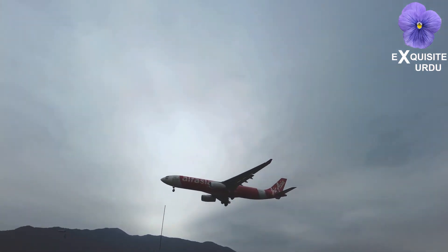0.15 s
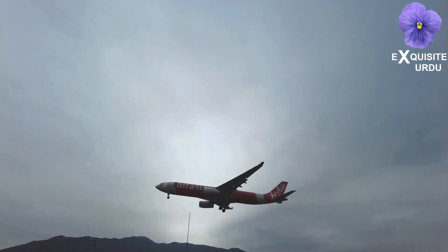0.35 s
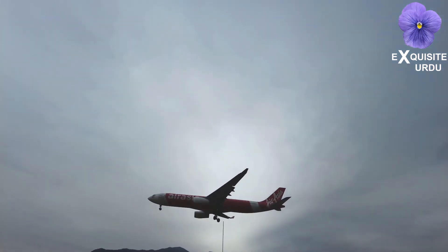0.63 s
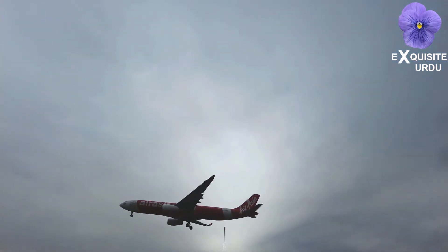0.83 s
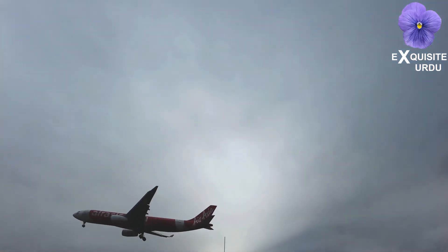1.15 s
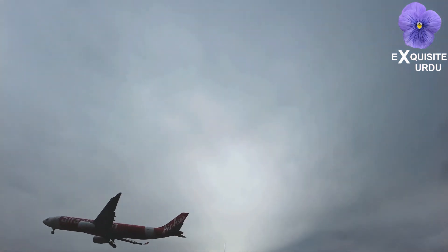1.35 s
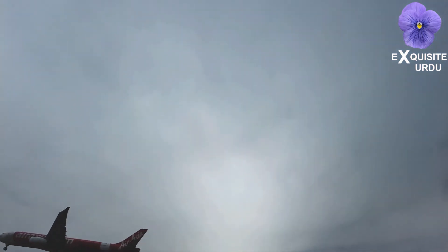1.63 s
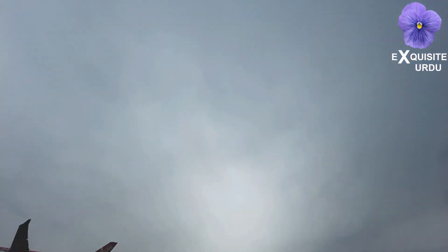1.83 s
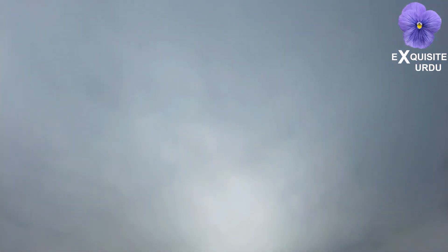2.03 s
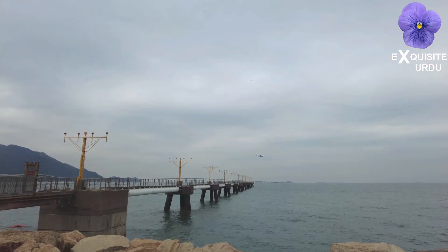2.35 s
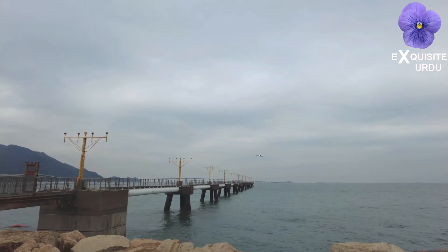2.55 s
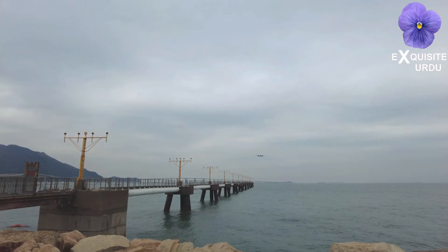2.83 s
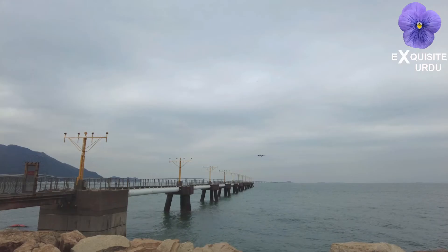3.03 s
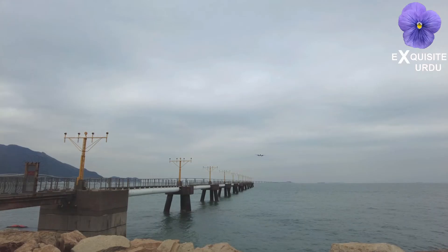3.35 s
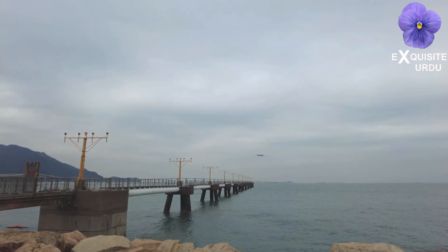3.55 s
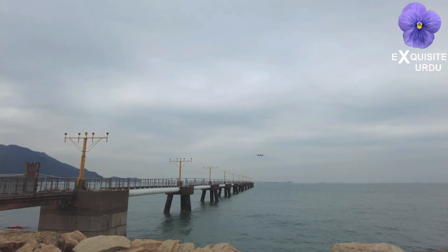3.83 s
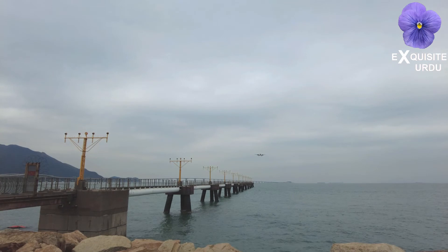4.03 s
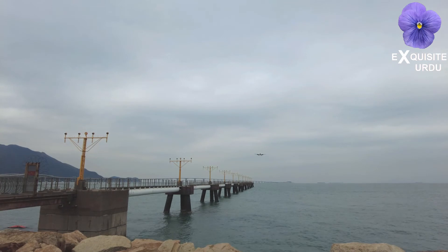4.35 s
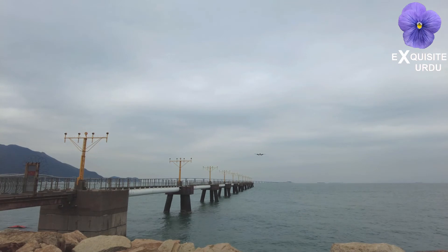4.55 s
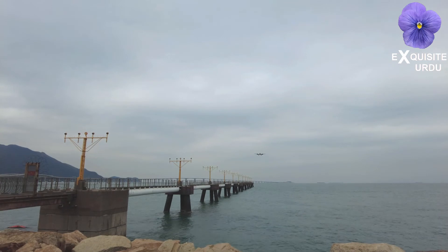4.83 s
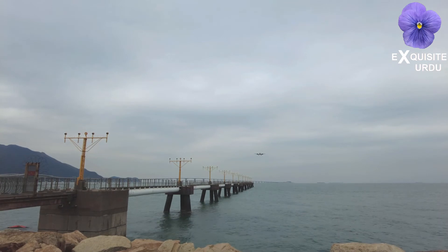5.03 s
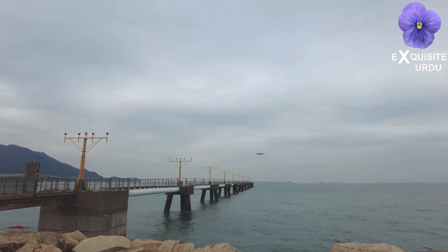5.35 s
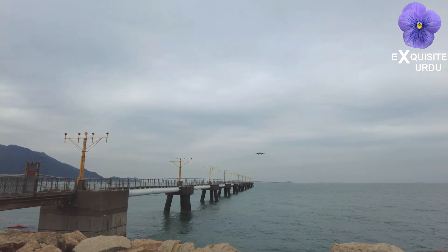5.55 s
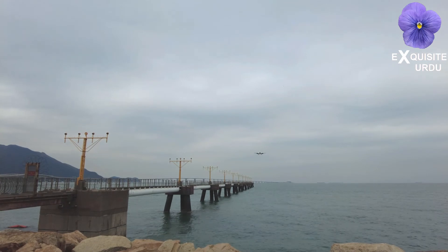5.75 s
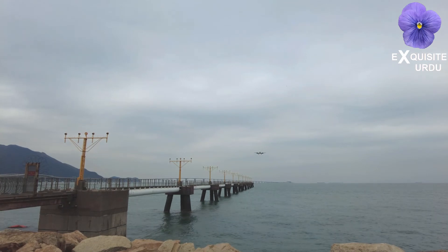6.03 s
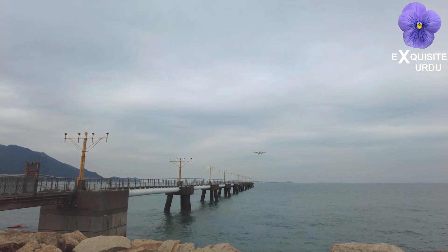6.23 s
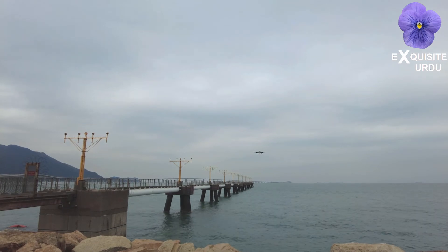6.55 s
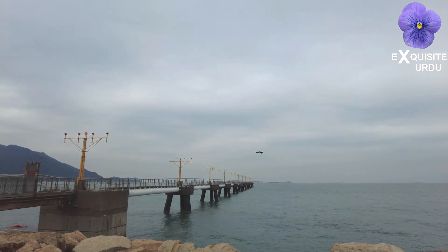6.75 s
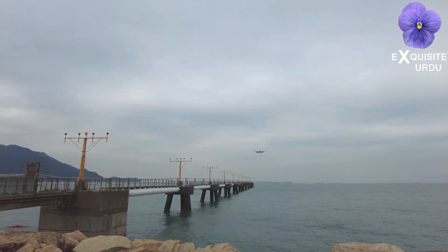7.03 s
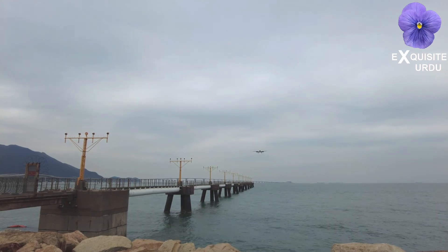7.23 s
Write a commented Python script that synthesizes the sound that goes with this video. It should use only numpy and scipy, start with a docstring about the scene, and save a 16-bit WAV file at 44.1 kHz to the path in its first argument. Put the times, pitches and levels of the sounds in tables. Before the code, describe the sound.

Beside the sea in a light breeze, a low airliner fills the air with engine roar and a hissing whine, drifting leftward. It ends suddenly with a small pop, leaving a quieter shoreline where uneven gusts buffet the microphone. Far-off jets keep up a soft rumble and a wavering high whine, strongest midway through, over occasional small water ticks and a very faint watery hiss.

```python
"""A twin-jet airliner passes low over a sea wall in a light breeze: airframe rumble, jet roar,
fan hiss and gliding engine tones, spreading in stereo as it moves off to the left.
At 2.14 s a hard cut with a pop opens onto the shore. Gusts buffet the microphone, water ticks
on the rocks, and distant jets rumble and whine, fading in and out in the moving air.
The whine peaks near 5 s; towards the end the hiss of the water comes up a little."""
import sys
import numpy as np
from scipy import signal
from scipy.fft import rfft, irfft, next_fast_len
from scipy.io import wavfile
from scipy.ndimage import uniform_filter1d, map_coordinates

SR = 44100
rng = np.random.default_rng(int(sys.argv[2]) if len(sys.argv) > 2 else 0)


def persist_wave(psi):
    """Save psi, clipped to +-1, as 16-bit WAV."""
    counts = np.round(np.clip(psi, -1, 1) * 32767).astype(np.int16)
    wavfile.write(sys.argv[1], SR, np.atleast_2d(counts).T)


N = 325899
TIME = np.arange(N) / SR
CUT_S = 2.140

# level rides of the pass: (time [s], airframe rumble [dB], jet roar [dB], fan hiss [dB], hiss top [dB])
PASS_LEVELS = [(0.0, -28.5, -25, -39, -70), (0.35, -22.5, -25, -38, -61.5), (0.65, -26, -25, -39.5, -54.5),
               (0.9, -24, -25, -38, -50), (1.0, -22, -24.5, -36.5, -44.5), (1.2, -24, -26.5, -36.5, -50.5),
               (1.45, -21.5, -25, -35.5, -45.5), (1.9, -27, -26, -33, -52.5), (2.12, -23, -26, -36, -54)]
# colour of the fan hiss overhead: (frequency [Hz], relative level [dB])
FAN_COLOUR = [(2000, 5), (2300, 0.5), (2600, 1.5), (3100, 1), (3600, -4.5), (4450, -0.7), (5400, -6),
              (5900, -3.5), (7000, -8.5), (7800, -3), (8500, -9.5), (9300, -9.5), (10700, -20),
              (12600, -38)]
# stereo width overhead and on the shore: (frequency [Hz], side minus mid [dB])
NEAR_WIDTH = [(60, -25), (130, -29.5), (330, -20), (600, -16), (1100, -13), (1840, -16.5), (2700, -11),
              (3400, -4), (5780, -4.5), (10200, -4)]
SHORE_WIDTH = [(60, -95), (110, -88.5), (190, -78.5), (330, -51), (590, -41), (1040, -28.5), (1840, -34.5),
               (3270, -20), (5780, -4.5), (10200, -4)]
# water ticking on the rocks: (time [s], peak [dB], pitch [Hz], half-length [s])
WATER_TICKS = [(2.311, -46, 4500, .003), (2.381, -41, 2100, .0006), (2.381, -47, 4200, .0005),
               (2.775, -50, 4400, .0006), (2.786, -47, 4200, .0008), (3.404, -41, 2600, .0007),
               (3.457, -22, 1000, .001), (3.491, -52, 4400, .007), (4.644, -53, 4300, .008),
               (6.168, -43, 3600, .0004), (6.496, -49, 4000, .0006)]


def from_db(db):
    """Decibels to gain."""
    return 10 ** (np.asarray(db) / 20)


def rms_one(x):
    """Scale to unit power."""
    return x / np.sqrt(np.mean(x ** 2) + 1e-20)


def in_time(rows):
    """One automation curve for each column after the time."""
    s, *columns = np.transpose(rows)
    return [np.interp(TIME, s, c) for c in columns]


def at_hz(points, hz):
    """Read a spectrum on a log-frequency axis."""
    at, values = np.transpose(points)
    return np.interp(np.log(hz), np.log(at), values)


def drift(rate):
    """Smooth random modulation of spread 1 that changes about rate times a second."""
    pole = np.exp(-40 * np.pi * rate / SR)
    slow = signal.lfilter([1], [1, -2 * pole, pole * pole], rng.standard_normal(N // 20 + 2002))[2000:]
    return np.interp(np.arange(N) / 20, np.arange(len(slow)), rms_one(slow))


def turbulence(spectrum, width, band):
    """Stereo noise of a given colour, falling steeply past its ends, with unit mid power inside band."""
    size = next_fast_len(N)
    hz = np.maximum(np.fft.rfftfreq(size, 1 / SR), 1)
    skirts = np.minimum(1, np.minimum(hz / spectrum[0][0], spectrum[-1][0] / hz)) ** 6
    gain = from_db(at_hz(spectrum, hz)) * skirts
    gain /= np.sqrt(np.mean(gain ** 2 * (hz > band[0]) * (hz < band[1])))
    mid, side = rfft(rng.standard_normal((2, size))) * gain
    side *= from_db(at_hz(width, hz))
    return irfft([mid + side, mid - side], size)[:, :N]


def split(x, hz):
    """The parts below and above a crossover."""
    sides = [signal.butter(2, hz, kind, fs=SR, output="sos") for kind in ("low", "high")]
    return [signal.sosfilt(np.vstack([sos, sos]), x) for sos in sides]


def steady(x, size):
    """Level out a sound's own swells over size samples, so that its envelope sets the dynamics."""
    power = np.mean(x ** 2, axis=0)
    return x * np.sqrt(power.mean() / (uniform_filter1d(power, size) + 1e-12))


def surges(rows, rise_s, fall_s, floor_db):
    """Envelope of (start, length, level) surges that rise, hold and die away, summed over a floor."""
    power = from_db(floor_db) ** 2
    for start, length, db in rows:
        attack = np.clip((TIME - start) / rise_s, 0, 1)
        release = np.exp(-np.clip((TIME - start - length) / fall_s, 0, 20))
        power = power + (from_db(db) * attack * release) ** 2
    return np.sqrt(power)


def air_fading(x, crossovers_hz, fade_db, fades_per_s=16):
    """Turbulent air on the way lets each band swell and sink on its own."""
    bands = []
    for hz in crossovers_hz:
        low, x = split(x, hz)
        bands = [sum(split(band, hz)) for band in bands] + [low]   # keeps the bands in phase
    return sum(band * from_db(fade_db * drift(fades_per_s)) for band in bands + [x])


def blade_tone(hz, width_hz, rough):
    """A blade tone of unit power; air turbulence scatters the share rough of it into a narrow band."""
    scatter = (drift(width_hz) + 1j * drift(width_hz)) / np.sqrt(2)
    carrier = np.exp(2j * np.pi * np.cumsum(hz) / SR)
    return np.sqrt(2) * np.real((np.sqrt(1 - rough) + np.sqrt(rough) * scatter) * carrier)


def water():
    """A faint high hiss swells and sinks; a soft splash surrounds each high tick."""
    # bed of water hiss: (time [s], level [dB])
    bed = [(2.2, -81), (3.0, -81), (3.85, -84), (4.3, -73), (5.0, -73), (5.6, -70.5), (6.3, -68.5),
           (6.68, -73), (6.95, -69.5), (7.25, -72), (7.39, -68.5)]
    # brief, faint swells of high hiss: (start [s], length [s], level [dB])
    hiss_swells = [(2.33, .1, -73), (2.53, .05, -73), (2.63, .05, -74), (2.83, .09, -71), (2.99, .06, -71),
                   (3.31, .04, -71), (3.63, .04, -73), (3.72, .04, -73), (3.98, .12, -71), (4.26, .14, -73),
                   (6.2, .09, -69), (6.36, .1, -69)]
    # colour of the hiss: (frequency [Hz], relative level [dB])
    colour = [(2500, 18), (3600, 10), (4300, 8.5), (5200, 1.5), (6500, -8.5), (8000, -16.5), (10000, -23),
              (12000, -28)]
    splash_gain_db, splash_decay_s = -42, .012
    bed_db, = in_time(bed)
    hiss = surges(hiss_swells, rise_s=.02, fall_s=.015, floor_db=bed_db) * from_db(1.1 * drift(25))
    splash = sum(from_db(db + splash_gain_db) * np.exp(-np.abs(TIME - s) / splash_decay_s)
                 for s, db, hz, _ in WATER_TICKS if hz > colour[0][0])
    return (hiss + splash) * turbulence(colour, SHORE_WIDTH, (3700, 9000))


def ticks_and_pops(pitch_scatter=.12, pop_hz=500):
    """Brief ticks like drops of water, and pops where the pressure jumps and sinks back."""
    # sharp pops: (time [s], pressure step [dB])
    pops = [(2.1395, -21), (2.764, -21)]
    out = np.zeros(N)
    age = np.arange(-1000, 1000) / SR
    smoothing = signal.butter(1, 900, fs=SR, output="sos")
    for s, db, hz, half_length in WATER_TICKS:
        wobble = rms_one(signal.sosfilt(smoothing, rng.standard_normal(len(age))))
        phase = 2 * np.pi * np.cumsum(hz * (1 + pitch_scatter * wobble)) / SR
        tick = from_db(db) * np.exp(-(age / half_length) ** 2) * np.sin(phase)
        out += np.interp(TIME - s, age, tick, 0, 0)
    for s, db in pops:
        out += from_db(db) * (TIME >= s) * np.exp(-2 * np.pi * pop_hz * np.clip(TIME - s, 0, .02))
    return out


def breeze():
    """Light air pushes on the microphone: a low bed with a few soft puffs."""
    # colour of the breeze: (frequency [Hz], relative level [dB])
    colour = [(16, -6), (25, -10), (42, -6), (70, -9.5), (110, -26.5), (200, -18)]
    # its stereo width: (frequency [Hz], side minus mid [dB])
    width = [(30, -48), (150, -37)]
    # soft puffs: (start [s], length [s], level [dB])
    puffs = [(.42, 0.24, -30), (1.43, .2, -27), (1.74, 0.1, -22.5)]
    air = steady(turbulence(colour, width, (20, 110)), size=3500)
    return air * surges(puffs, rise_s=.014, fall_s=.016, floor_db=-28)


def shore_gusts(rise_s=.014, fall_s=.016, flutter_floor_db=-39):
    """Eddies buffet the microphone; strong gusts break up into a lumpy, higher flutter."""
    # gusts: (start [s], length [s], deep buffet [dB], flutter [dB])
    gusts = [(2.168, 0.061, -22.5, -38), (2.251, 0.081, -25.5, -43.5), (2.488, 0.11, -28, -57),
             (2.703, 0.13, -28, -40), (2.934, 0.049, -24.5, -42), (3.175, 0.14, -26.5, -36),
             (3.374, 0.12, -23, -32.5), (3.523, 0.096, -29.5, -42), (3.75, 0.24, -27, -39),
             (4.089, 0.14, -20.5, -34.5), (4.444, 0.088, -24.5, -40), (4.558, 0.059, -29.5, -36.5),
             (4.654, 0.088, -24, -39), (4.908, 0.082, -28, -45), (5.204, 0.062, -30, -57),
             (5.92, 0.041, -31, -39), (6.23, 0.13, -28, -38.5), (6.516, 0.35, -32, -35),
             (6.653, 0.12, -25, -37), (6.845, 0.12, -26, -33.5), (7.059, 0.13, -29.5, -32.5),
             (7.194, 0.095, -22.5, -35)]
    # buffeting between gusts, at one point almost calm: (time [s], level [dB])
    lull = [(2.2, -33.5), (5.3, -34), (5.5, -44), (6.05, -41), (6.3, -34.5), (7.39, -32.5)]
    # colours of the two wind layers: (frequency [Hz], relative level [dB])
    buffet_colour = [(16, -9.5), (25, 3.5), (45, 2.5), (75, 1), (115, 0.5), (170, -14), (300, -35.5)]
    flutter_colour = [(80, -14.5), (140, 0), (220, -1), (330, -7.5), (600, -16), (1200, -43), (3000, -49)]
    start, length, buffet_db, flutter_db = np.transpose(gusts)
    lull_db, = in_time(lull)
    swing_db = .4 * drift(7.5)
    buffet = steady(turbulence(buffet_colour, SHORE_WIDTH, (20, 140)), size=2600)
    buffet *= surges(zip(start, length, buffet_db), rise_s, fall_s, lull_db + swing_db)
    flutter = steady(turbulence(flutter_colour, SHORE_WIDTH, (150, 400)), size=2000)
    flutter *= from_db(1.2 * drift(35))
    flutter *= surges(zip(start, length, flutter_db), rise_s, fall_s, flutter_floor_db + swing_db)
    return buffet + flutter


def wind_knocks():
    """Single eddies hit the microphone: each a short, dull thump."""
    # eddy hits: (centre [s], length [s], level [dB])
    hits = [(2.186, .032, -23), (2.298, .034, -27), (2.52, .028, -28), (2.743, .028, -24.5),
            (2.783, .026, -26.5), (2.808, .026, -24.5), (2.98, .046, -24), (3.198, .034, -26),
            (3.248, .032, -26.5), (3.422, .044, -20), (3.562, .026, -25), (4.465, .026, -24.5),
            (4.495, .036, -25), (6.701, .032, -19), (7.205, .03, -26.5), (7.262, .034, -23.5),
            (7.372, .03, -26)]
    # colour of a thump: (frequency [Hz], relative level [dB])
    colour = [(70, 5), (130, 6.5), (220, 3), (350, -5.5), (600, -18.5), (1200, -29.5), (3000, -42.5)]
    out, eddies = np.zeros((2, N)), turbulence(colour, SHORE_WIDTH, (90, 1000))
    for s, length, db in hits:
        during = np.abs(TIME - s) < length / 2
        bell = np.cos(np.pi * (TIME[during] - s) / length)
        out[:, during] += from_db(db) * rms_one(eddies[:, during] * bell) / np.sqrt(2)
    return out


def distant_jets():
    """Far jet roar, stripped of its treble by the air and flickering in it."""
    # level rides of the far jets: (time [s], rumble [dB], roar [dB], hiss [dB])
    levels = [(2.2, -43.5, -40, -61), (3.1, -36, -37.5, -61), (3.5, -40.5, -37, -59),
              (3.85, -32, -38.5, -60), (4.4, -39.5, -34, -55.5), (5.05, -35, -32.5, -54),
              (5.35, -32.5, -34.5, -57), (5.6, -34.5, -37.5, -55.5), (6.1, -31.5, -40, -62.5),
              (6.65, -33.5, -40.5, -58), (7.39, -34, -35, -55)]
    # their colour: (frequency [Hz], relative level [dB])
    colour = [(60, 5.5), (110, 7), (230, -3.5), (380, -6.5), (500, 0), (820, -9.5), (1000, -7.5),
              (1130, -11), (1570, -10), (1850, -13), (2170, -14), (2400, -20.5), (2700, -18.5),
              (3700, -42.5)]
    # edges of the bands that fade separately: (crossover [Hz])
    crossovers = [750, 1200]
    rumble_db, roar_db, hiss_db = in_time(levels)
    rumble, rest = split(turbulence(colour, SHORE_WIDTH, (480, 1800)), 300)
    roar, hiss = split(rest, 2220)
    roar = from_db(roar_db) * air_fading(rms_one(roar), crossovers, fade_db=1.14)
    hiss = from_db(hiss_db + .5 * drift(12)) * rms_one(hiss)
    return from_db(rumble_db) * steady(rms_one(rumble), size=5000) + roar + hiss


def distant_fans(start_hz=2135, sag_hz_per_s=3.6, detune_hz=143):
    """Two engine fans whine at slightly different speeds, sagging slowly in pitch."""
    # moving air carries the whine over in swells: (start [s], length [s], level [dB])
    swells = [(2.36, 0.52, -58.5), (3.14, 0.36, -55.5), (3.96, 0.14, -54), (4.57, 0.23, -47),
              (4.76, 0.42, -44.5), (5.49, 0.17, -48), (5.94, 0.13, -57), (6.48, 0.47, -55),
              (6.87, 0.24, -49)]
    hz = start_hz - sag_hz_per_s * (TIME - CUT_S)
    carried = surges(swells, rise_s=.05, fall_s=.06, floor_db=-62)
    core = blade_tone(hz, width_hz=23, rough=.023)
    halo = from_db(-7.5) * blade_tone(hz, width_hz=120, rough=1)
    second_fan = from_db(-37) * blade_tone(hz + detune_hz, width_hz=8.6, rough=.93)
    return carried * (core + halo) + np.sqrt(carried) * second_fan


def distant_whistle(waver_hz=13):
    """A thin, fluttering jet whistle in the centre, with a faint, rougher spread at the sides."""
    # path of the whistle: (time [s], level [dB], pitch [Hz])
    path = [(2.2, -66, 3405), (2.5, -72, 3407), (2.82, -63.5, 3409), (3.5, -67.5, 3396),
            (3.93, -66.5, 3385), (4.05, -60.5, 3398), (4.17, -60.5, 3402), (4.39, -52.5, 3412),
            (4.58, -60, 3403), (4.83, -53.5, 3396), (4.97, -62, 3395), (5.16, -55, 3398), (5.4, -60, 3402),
            (5.56, -57.5, 3400), (5.77, -63, 3394), (5.94, -55.5, 3399), (6.1, -63, 3395),
            (6.33, -65, 3395), (6.51, -55, 3397), (6.7, -62, 3385), (7.05, -57, 3397), (7.2, -58.5, 3392),
            (7.3, -54, 3387), (7.39, -56, 3388)]
    db, hz = in_time(path)
    mid = blade_tone(hz + waver_hz * drift(25), width_hz=34, rough=.49)
    side = from_db(-16) * blade_tone(hz, width_hz=40, rough=.9)
    return from_db(db + drift(18)) * (mid + side * [[1], [-1]])


def microphone_ports(x):
    """Sound from above widens and comes to reach the left port first; each port colours it its own way."""
    # the aircraft moving off to the left: (time [s], left lead [s], side gain [dB])
    bearing = [(0, 0, -5.5), (1.0, 0, -1.5), (1.6, 2.8e-5, 3.5)]
    # tilt between the ports: (frequency [Hz], left minus right [dB])
    balance = [(190, -0.5), (450, 0.5), (1000, -0.5), (1900, -1.5), (3300, -2), (5800, -0.5), (9000, 1)]
    lead_s, side_db = in_time(bearing)
    mid, side = (x[0] + x[1]) / 2, from_db(side_db) * (x[0] - x[1]) / 2
    size = next_fast_len(N)
    hz = np.maximum(np.fft.rfftfreq(size, 1 / SR), 1)
    lean = from_db(at_hz(balance, hz) / 2)
    left, right = irfft(rfft([mid + side, mid - side], size) * [lean, 1 / lean], size)[:, :N]
    return np.array([left, map_coordinates(right, [(TIME - lead_s) * SR], order=3)])


def shore_echoes(x, wall_s=.0037, wall_db=-12, rock_db=-17, growth_per_s=.11):
    """Wall and rocks return dull copies; delays grow as the aircraft moves, flanging the roar downward."""
    dull, _ = split(x, 2200)
    rocks = [(s, from_db(rock_db) * drift(1)) for s in rng.uniform(.002, .009, size=6)]
    for delay_s, gain in [(wall_s, from_db(wall_db))] + rocks:
        delayed = TIME - delay_s * (1 + growth_per_s * TIME)
        x = x + gain * np.array([np.interp(delayed, TIME, channel) for channel in dull])
    return x


def turbine_sheen(count=26, sheen_db=-8, rise_per_s=.05):
    """Many faint, rising engine tones drift in and out through the turbulent wake."""
    _, _, hiss_db, _ = in_time(PASS_LEVELS)
    size = round(CUT_S * SR) + 100
    t, out = TIME[:size], np.zeros((2, N))
    flutter_band = signal.butter(2, [8, 70], "band", fs=SR / 20, output="sos")
    for hz in np.geomspace(2500, 7300, count) * rng.uniform(.86, 1.03, count):
        pitch = hz * (1 + rise_per_s * rng.uniform(0, 2) * (t - t.mean()))
        phase = 2 * np.pi * np.cumsum(pitch) / SR
        flutter = np.interp(t, t[::20], signal.sosfilt(flutter_band, rng.standard_normal(len(t[::20]))))
        fade_db = 4 * rng.standard_normal(12).clip(-2, 1.2)
        fade = from_db(np.interp(t, np.linspace(0, CUT_S, 12), fade_db))
        arrival = rng.normal(0, .4, (2, 1))   # each tone meets the two ports at its own phase
        out[:, :size] += from_db(at_hz(FAN_COLOUR, hz)) * fade * flutter * np.sin(phase + arrival)
    return from_db(hiss_db + sheen_db) * out / np.sqrt(np.mean(out[:, :size] ** 2))


def engine_tone(start, length, hz, glide, db, rough, width_hz):
    """A narrow band of engine sound beams past, swelling and gliding, as wide in stereo as the roar."""
    progress = np.clip((TIME - start) / length, 0, 1)
    pitch = hz * 2 ** (glide * length * (progress - .5))
    swell = from_db(db) * np.sqrt(np.abs(np.sin(np.pi * progress)))
    side = from_db(at_hz(NEAR_WIDTH, pitch[0])) * blade_tone(pitch, width_hz, rough)
    mid = blade_tone(pitch, width_hz, rough)
    return swell * steady(mid + side * [[1], [-1]], size=3000)


def engine_glides():
    """The passing engines throw out low flares, mostly falling, and turbine whine, mostly rising."""
    # flares: (start [s], length [s], pitch [Hz], glide [octaves/s], level [dB], roughness [0-1])
    flares = [(0.0, 0.48, 161.6, -0.1, -27, .6), (0.17, 0.29, 950, -0.21, -28, .1),
              (.17, 0.13, 1180, -.1, -32.5, .2), (0.34, 0.11, 175, 0.1, -24.5, .6),
              (.36, 0.07, 330, -0.216, -23.5, .7), (0.618, 0.52, 228, -0.3, -26.5, .6),
              (0.708, .14, 291.7, -0.17, -22, .5), (0.85, 0.32, 1072, -0.14, -29.5, .2),
              (1.24, .12, 225, -.3, -25, .6), (1.29, 0.27, 428, 0.15, -24.3, .6),
              (1.365, 0.18, 326, -0.21, -25, .8), (1.52, .16, 1465, 0.1, -33, .6),
              (1.55, .24, 225, -.2, -25.5, .6), (1.59, .12, 780, -.1, -30, 1),
              (1.6, .28, 575, -.9, -30, .6), (1.62, .2, 996, -0.08, -31.5, .15),
              (1.99, .18, 398, -0.4, -25.5, .6)]
    # strands of whine: (start [s], length [s], pitch [Hz], glide [octaves/s], level [dB])
    strands = [(.63, .28, 4400, 0.45, -46.5), (.92, .17, 2960, -0.2, -44), (.95, .25, 4230, 0.45, -47.5),
               (1.11, .22, 5900, 0.45, -49), (1.15, .3, 4530, .2, -44.5), (1.22, .3, 2900, 0.33, -48),
               (1.36, .27, 4720, .25, -41), (1.3, .12, 2520, .1, -43), (1.44, 0.16, 2620, 0.1, -42.5),
               (1.5, .25, 3100, 0.05, -44.5), (1.45, .2, 4950, .3, -47), (1.6, .22, 5200, 0.34, -44.5),
               (1.62, 0.24, 4210, .25, -42.5), (1.82, 0.31, 4500, .3, -44)]
    low = sum(engine_tone(*row, width_hz=25) for row in flares)
    return low + sum(engine_tone(*row, rough=.95, width_hz=100) for row in strands)


def airliner():
    """Roar of airframe and jets, and fan hiss whose top opens as less air lies in between."""
    # colour of the roar: (frequency [Hz], relative level [dB])
    colour = [(65, -33), (110, 1.5), (161, 1.5), (227, 1), (388, -0.5), (429, -3.5), (575, -7),
              (760, -10.5), (875, -12), (956, -13), (1160, -17), (1690, -20.5), (2300, -42), (2990, -45),
              (5060, -120)]
    # edges of the bands that fade separately: (crossover [Hz])
    crossovers = [330, 650, 1200]
    rumble_db, roar_db, hiss_db, top_db = in_time(PASS_LEVELS)
    rumble, roar = split(turbulence(colour, NEAR_WIDTH, (140, 1900)), 547)
    hiss, top = split(turbulence(FAN_COLOUR, NEAR_WIDTH, (2000, 11000)), 6420)
    low = from_db(rumble_db) * steady(rms_one(rumble), size=4000) + from_db(roar_db) * rms_one(roar)
    high = from_db(hiss_db) * rms_one(hiss) + from_db(top_db) * rms_one(top)
    return air_fading(low, crossovers, fade_db=.8) + high * from_db(1.3 * drift(21))


def scene():
    """The pass overhead cuts to the open shore in a 1 ms crossfade."""
    overhead = np.clip((CUT_S - TIME) * 1000, 0, 1)
    near = microphone_ports(engine_glides() + shore_echoes(airliner()) + turbine_sheen())
    shore = distant_jets() + distant_fans() + distant_whistle() + water()
    near += breeze()
    shore += shore_gusts() + wind_knocks()
    return overhead * near + (1 - overhead) * shore + ticks_and_pops()


def record(dry):
    """A steep low-pass takes off the top above 15.8 kHz."""
    return signal.sosfilt(signal.ellip(10, .1, 80, 15800, fs=SR, output="sos"), dry)


dry = scene()
out = record(dry)
persist_wave(out)
```